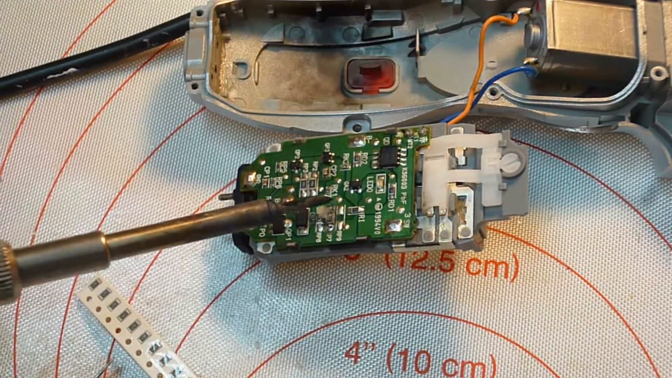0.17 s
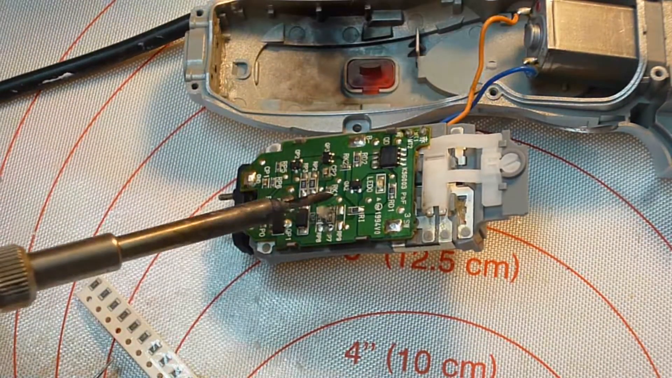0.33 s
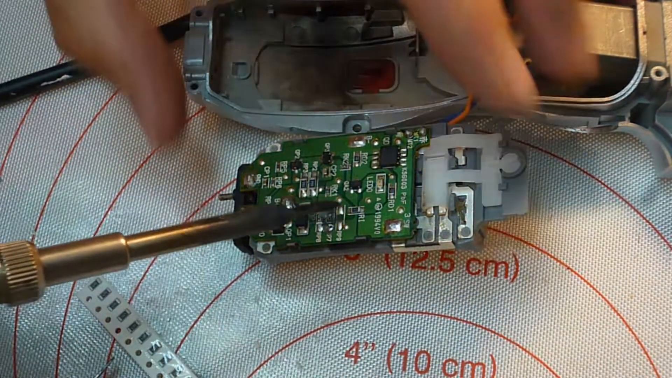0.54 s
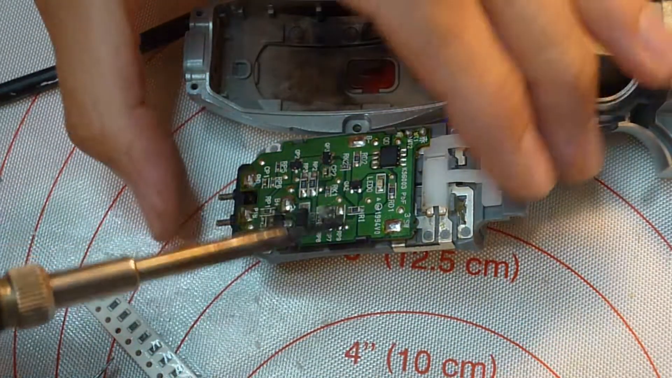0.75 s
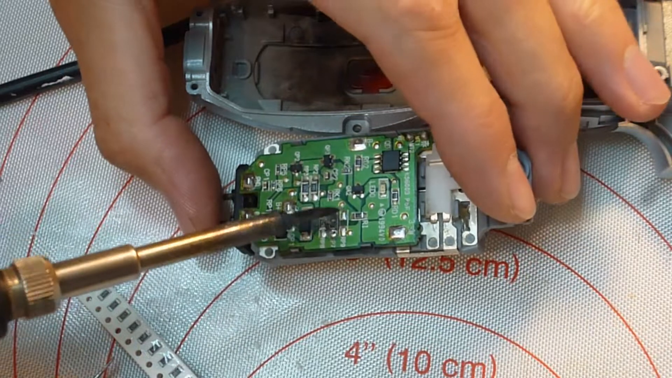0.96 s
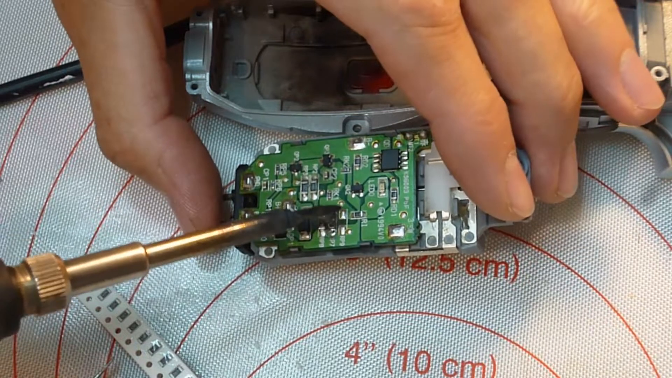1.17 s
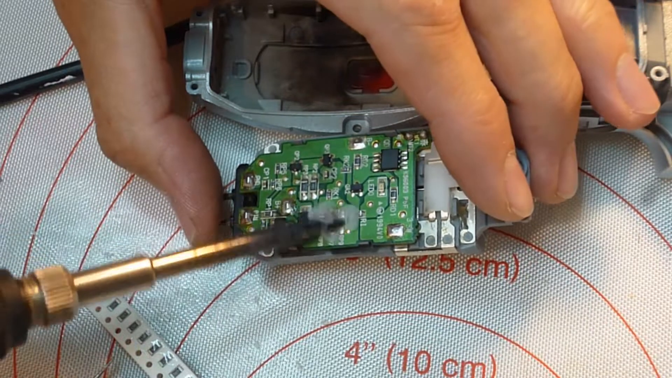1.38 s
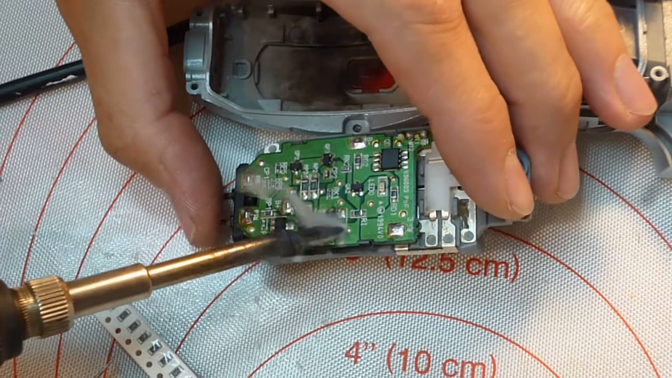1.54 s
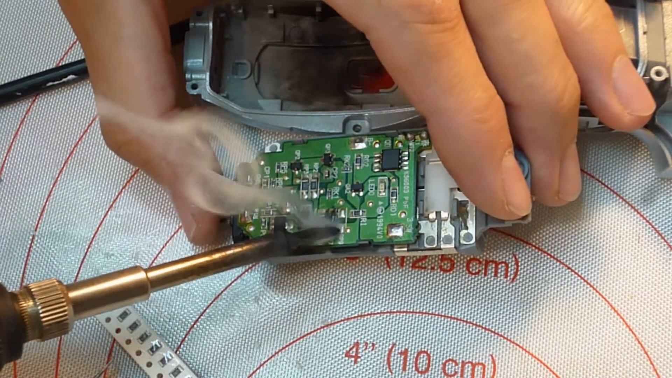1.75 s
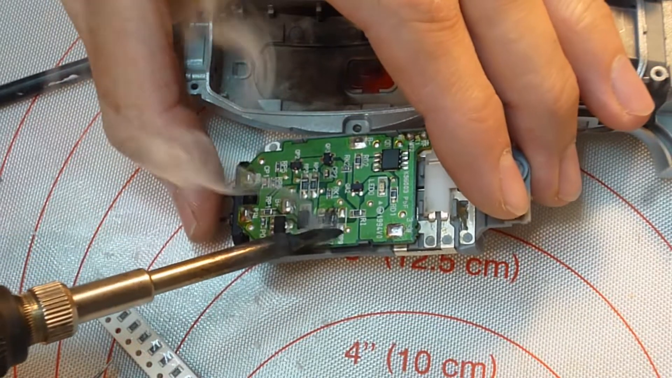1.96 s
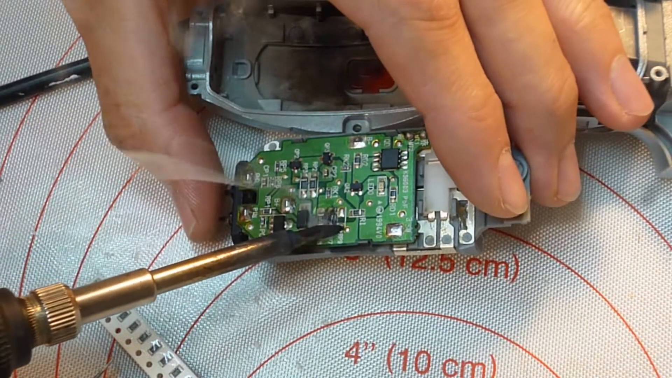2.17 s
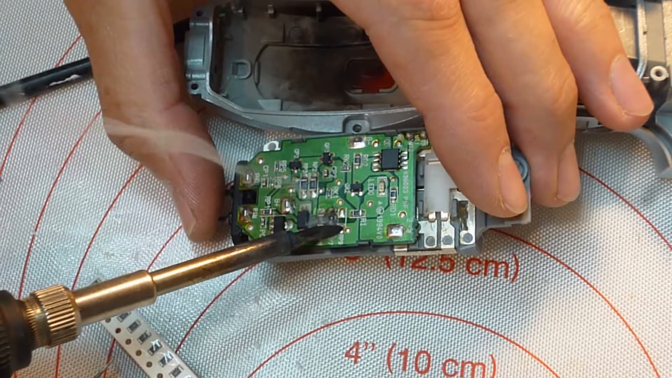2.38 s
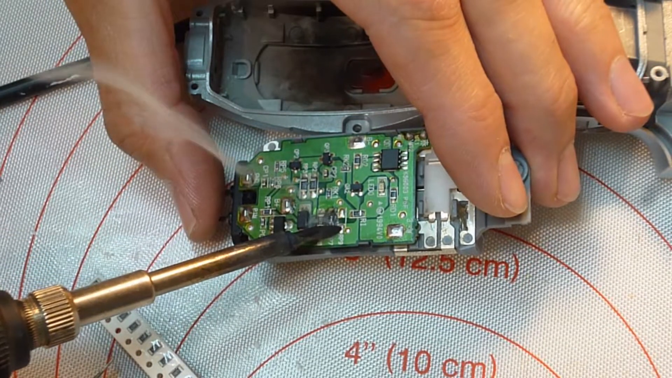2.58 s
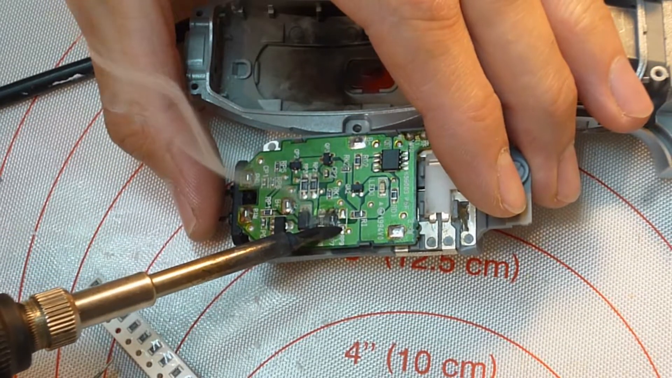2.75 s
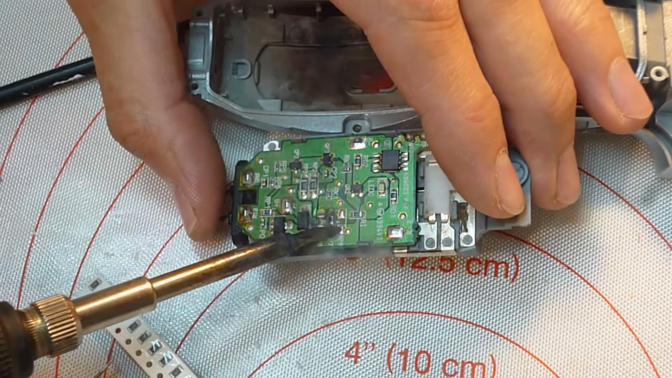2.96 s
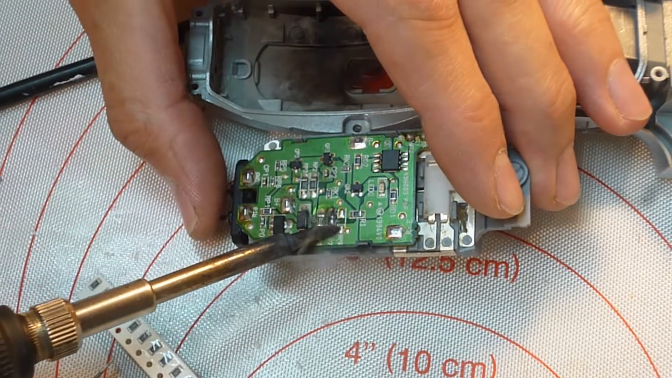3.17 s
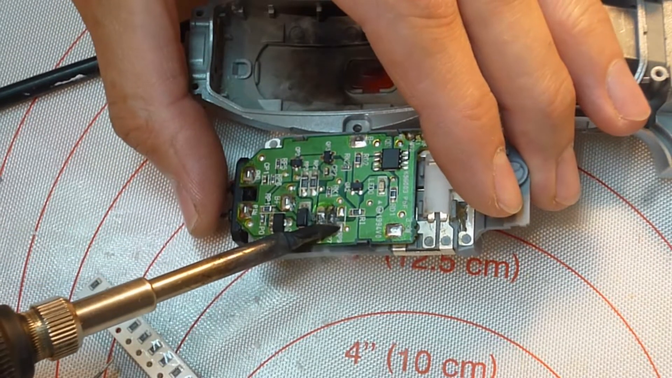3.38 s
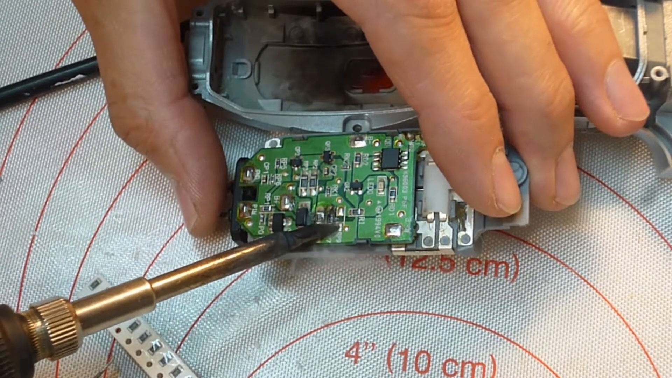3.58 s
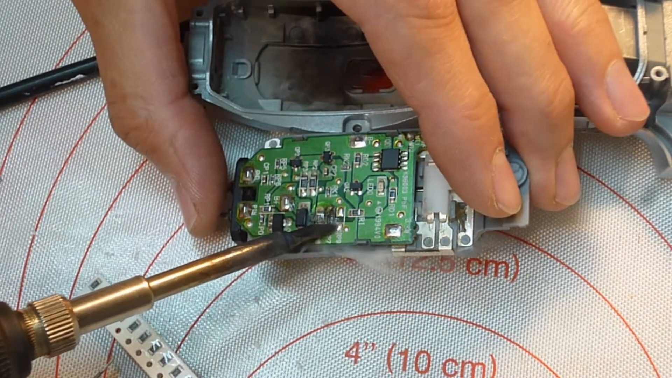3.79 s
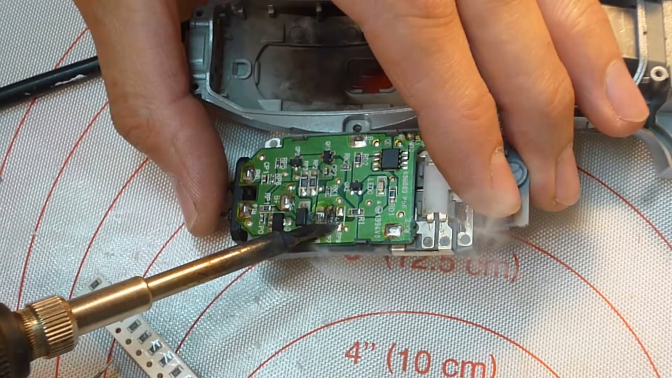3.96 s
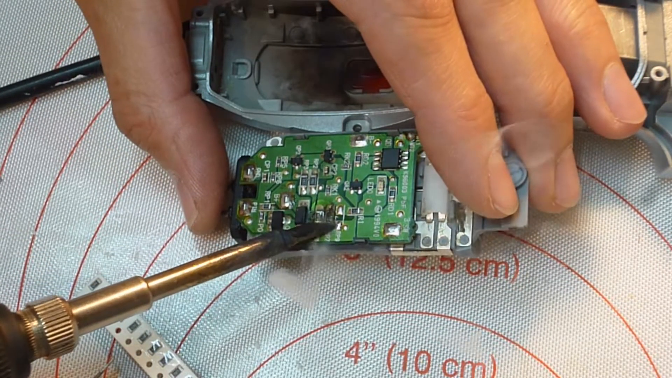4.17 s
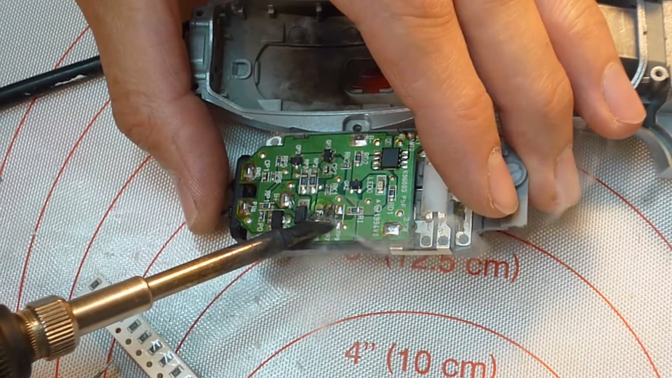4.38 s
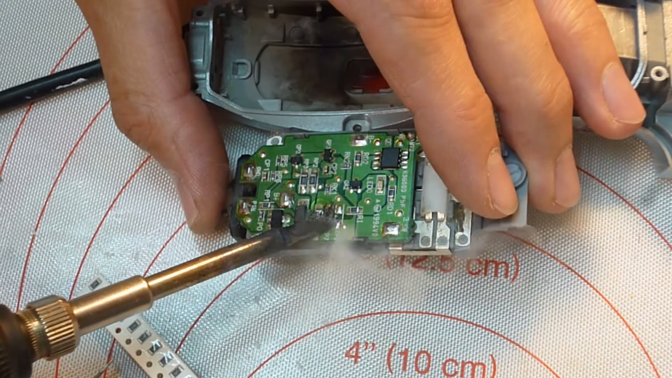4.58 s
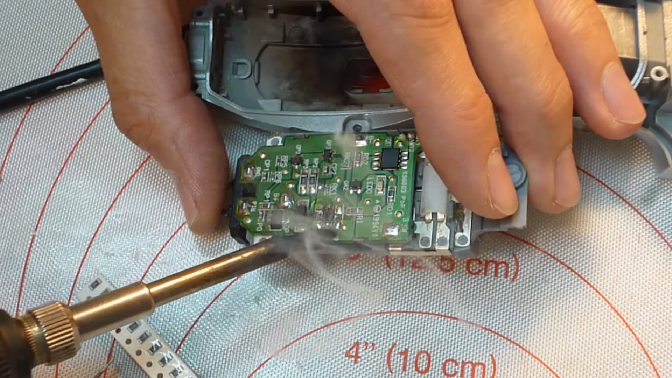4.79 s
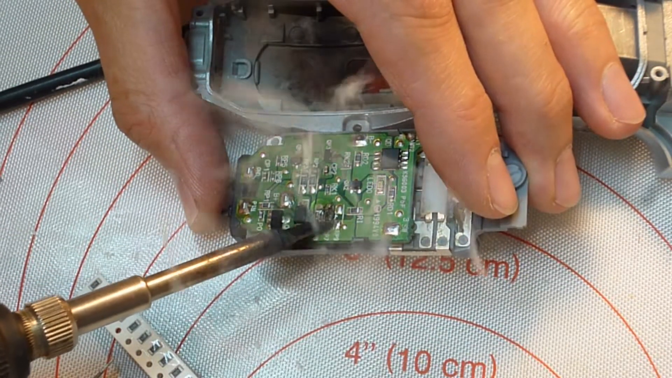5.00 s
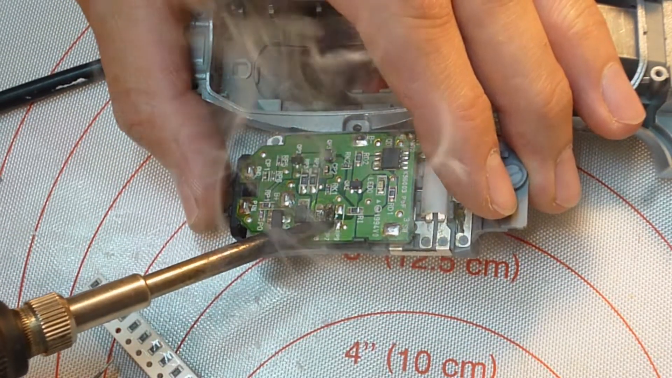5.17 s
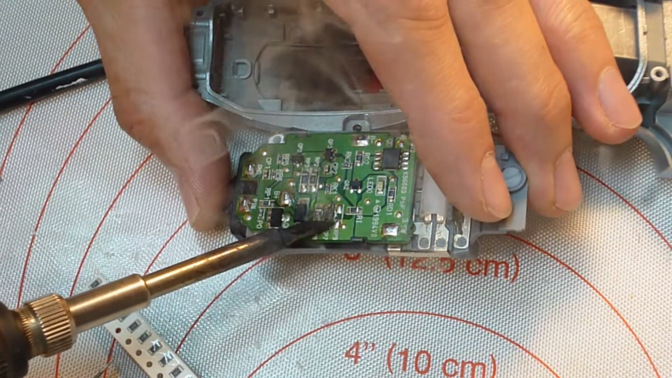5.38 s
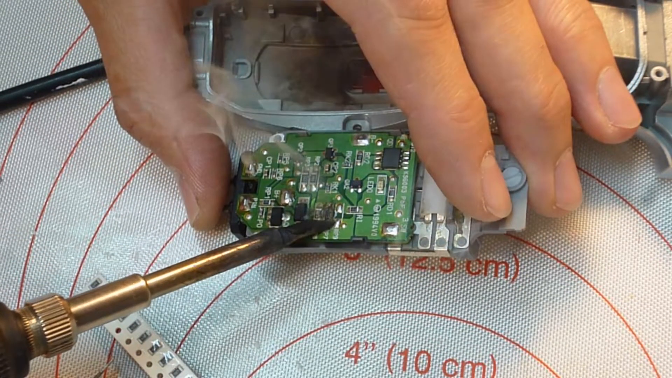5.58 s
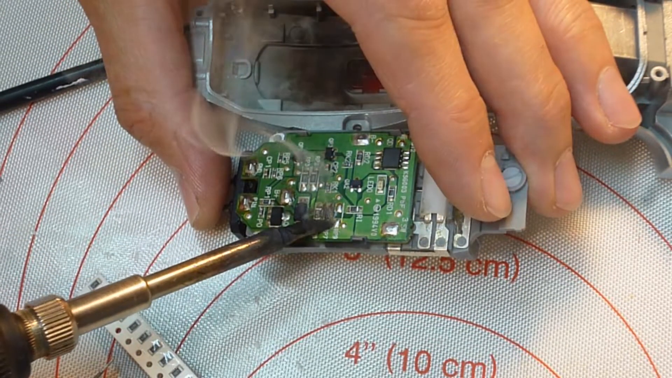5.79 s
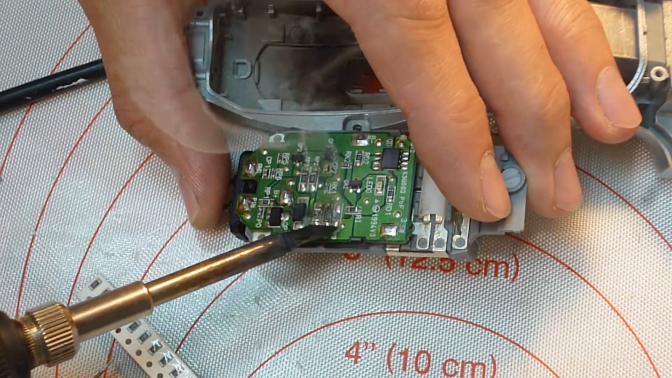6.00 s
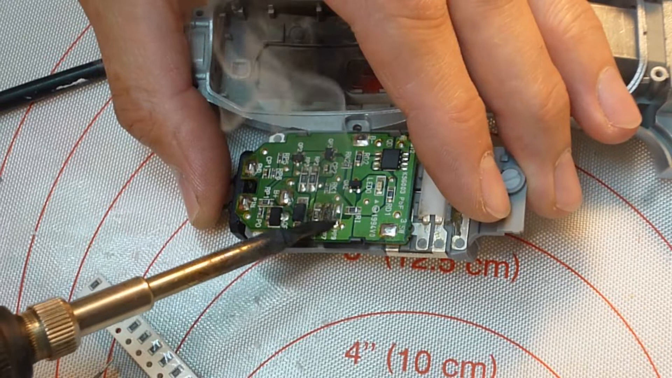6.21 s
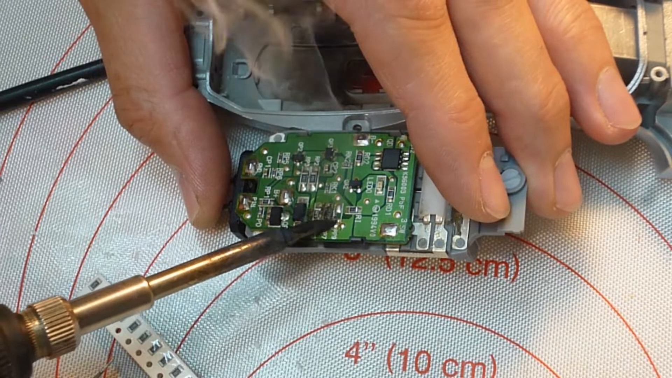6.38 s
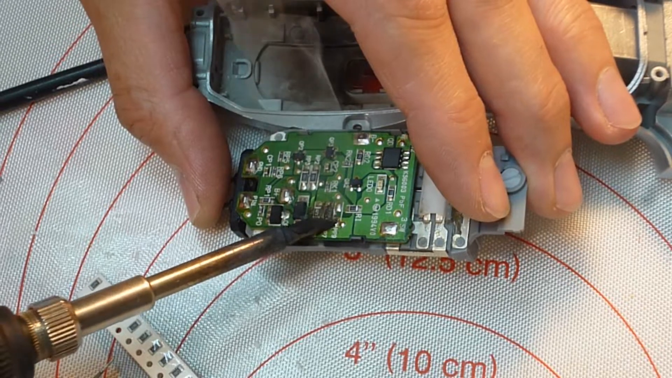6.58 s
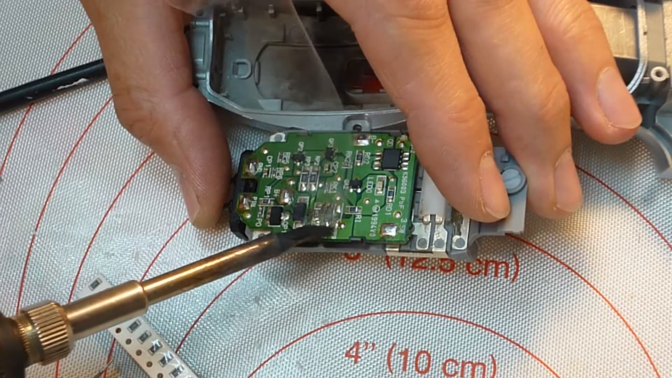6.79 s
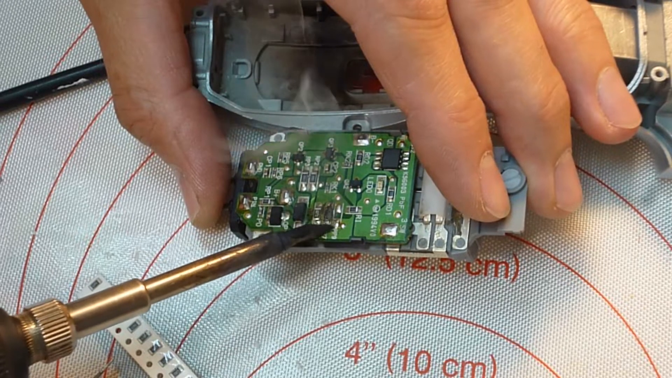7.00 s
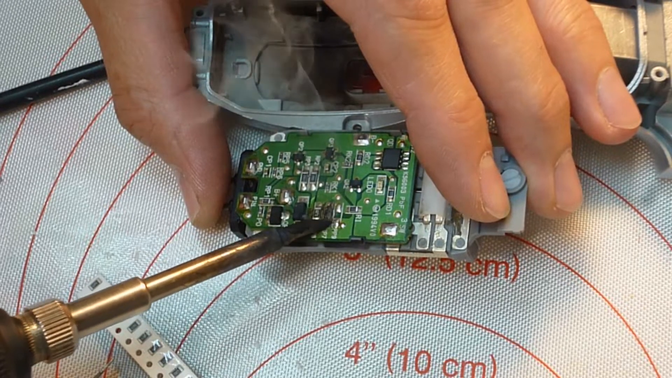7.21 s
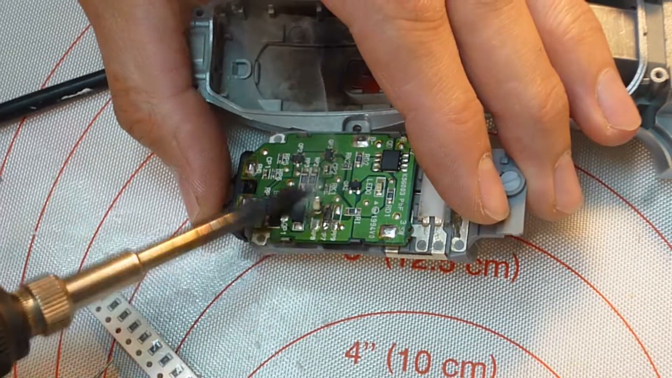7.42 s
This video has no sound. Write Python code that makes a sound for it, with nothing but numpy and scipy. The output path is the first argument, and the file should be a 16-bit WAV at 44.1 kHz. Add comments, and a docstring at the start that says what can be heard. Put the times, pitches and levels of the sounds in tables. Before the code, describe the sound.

Close mono pickup in a small, fairly dry room with soft low hush. First a heavy knock with a rapid rattle of bounces, then faint taps and pings of small parts. Melting flux under an iron gives isolated crisp ticks, one strong snap near the middle, a flurry of chirping squeaks, then a crackly run of pops with buzzes. Long near-silent gaps, with final light clicks.

```python
"""Stick-slip of a soldering tip on a circuit board

A hot iron tip creeps over a small board through melting flux, close to a mono microphone. Relaxation
oscillation gives single pops, buzzes and squeaks, as trains of slips that ring the modes of the board.
Decaying sines and modes make small taps and a tool dropped on the bench; modal noise makes fingers
shifting the plastic housing. A faint low tone rises; shaped noise is the hush of a small room."""
import sys
import numpy as np
from scipy import signal
from scipy.fft import rfft, irfft, next_fast_len
from scipy.io import wavfile
from scipy.ndimage import map_coordinates

SR = 44100
rng = np.random.default_rng(int(sys.argv[2]) if len(sys.argv) > 2 else 0)


def master(y):
    """Save y as 16-bit WAV."""
    cut = np.clip(np.atleast_2d(y).T, -1, 1)
    pcm = np.round(cut * 32767)  # scale
    wavfile.write(sys.argv[1], SR, pcm.astype(np.int16))


N = 328545  # length [samples]


def amp(db):
    """Logarithmic level: decibels to linear amplitude."""
    return 10 ** (np.asarray(db) / 20)


def along(points, hz):
    """Logarithmic pitch scale: interpolate (frequency [Hz], value) points on a log axis."""
    f, v = np.transpose(points)
    return np.interp(np.log(hz + 1), np.log(f + 1), v)


def filtered(x, response):
    """Linear filtering: multiply the spectrum by a complex response of frequency."""
    m = next_fast_len(len(x) + SR // 2)
    spectrum = rfft(x, m) * response(np.fft.rfftfreq(m, 1 / SR))
    return irfft(spectrum, m)[:len(x)]


def ringing(modes, damping=1, sign=-1):
    """Modal superposition: impulse response of a body, peak 1; damping scales the widths of its modes."""
    def resonance(f, center, width):
        return 1j * f * width / (center * center - f * f + 1j * f * width + 1e-9)

    def body(f):
        # sign is the polarity of each mode relative to its neighbour
        return sum(sign ** k * amp(db) * resonance(f, center, damping * width)
                   for k, (center, width, db) in enumerate(modes))

    ring = filtered(signal.unit_impulse(SR // 8), body)
    return ring / np.abs(ring).max()


def damped(hz, t60, attack):
    """Damped oscillation: an exponentially dying sine with a soft start, peak 1; times in s."""
    t = np.arange(SR // 8) / SR
    onset = 1 - np.exp(-t / attack)
    wave = np.sin(2 * np.pi * hz * t) * amp(-60 * t / t60) * onset
    return wave / np.abs(wave).max()


def add(track, s, sound):
    """Linear superposition: mix a sound into the track at time s, in place."""
    part = track[round(s * SR):][:len(sound)]
    part += sound[:len(part)]


# spectrum of the room noise: (frequency [Hz], relative spectral level [dB])
HUSH_SPECTRUM = [(15, -37.5), (25, -9), (33, -19), (102, -2.5), (340, -4), (446, -7.5), (543, -8),
                 (584, -10), (678, -10.5), (1420, -16), (6530, -27), (8150, -32), (8990, -41), (11700, -90),
                 (19800, -120)]
# mains hum: (frequency [Hz], rms level [dB])
MAINS_HUM = (51, -73.5)


def hush():
    """Stationary noise: spectrally shaped room rumble and microphone hiss, drifting in level, plus mains hum."""
    noise = filtered(rng.standard_normal(N), lambda hz: amp(along(HUSH_SPECTRUM, hz)))
    drift = map_coordinates(rng.standard_normal(40), [np.arange(N) * 4 / SR])  # 4 points per second
    hum_hz, hum_db = MAINS_HUM
    hum = np.sqrt(2) * amp(hum_db) * np.sin(2 * np.pi * hum_hz * np.arange(N) / SR)
    return amp(-54 + 0.3 * drift) * noise / noise.std() + hum


# reverberation of the room: (frequency [Hz], decay time T60 [s])
WALL_DECAY = [(300, 0.27), (2000, 0.18), (8000, 0.14)]


def room(x):
    """Diffuse reverberation: convolve with decaying noise, a new tail for each quarter second."""
    out, step = np.zeros(N), SR // 4
    for start in range(0, N, step):
        hz, t, cells = signal.stft(rng.standard_normal(SR // 3), SR, nperseg=256)
        decay = amp(-60 * t / along(WALL_DECAY, hz)[:, None])
        tail = signal.istft(cells * decay, SR, nperseg=256)[1]
        tail = tail / np.linalg.norm(tail)
        add(out, start / SR + 0.0045, signal.fftconvolve(x[start:start + step], tail))
    return out


# course of the low tone: (time [s], frequency [Hz], rms level [dB])
LOW_TONE = [(5.72, 75, -63), (5.76, 95, -53), (5.8, 119, -56.5), (5.84, 114, -50), (5.875, 105, -70)]


def swoop():
    """Frequency modulation: a faint low tone rises and fades, its phase the running sum of frequency."""
    s, hz, db = np.transpose(LOW_TONE)
    t = np.arange(N) / SR
    phase = 2 * np.pi * np.cumsum(np.interp(t, s, hz)) / SR
    level_db = np.interp(t, s, db, left=-120, right=-120)
    return np.sqrt(2) * amp(level_db) * np.sin(phase)


# modes of the plastic housing: (frequency [Hz], width [Hz], level [dB])
HOUSING_MODES = [(640, 340, -8.5), (973, 100, 4.5), (1686, 370, -6), (2830, 1200, -9.5)]
# finger slides on the housing: (start of hold [s], hold [s], rms level in the hold [dB])
FINGER_SLIDES = [(.19, 0.08, -54.5), (1.218, .058, -57), (2.216, 0.031, -52.5), (3.247, .005, -53),
                 (4.23, 0.0056, -51.5), (5.215, .05, -57.5), (7.44, .01, -45)]
GRIP_DB_PER_S, LET_GO_DB_PER_S = 796, 496  # rise before the hold, fall after it


def fingers():
    """Friction noise: skin drags in clumps on resonant plastic, gripping fast and letting go slower."""
    clump_db = 3.2 * np.repeat(rng.standard_normal(N // 200 + 1), 200)[:N]
    grain = rng.standard_normal(N) * amp(clump_db)
    rub = signal.fftconvolve(grain, ringing(HOUSING_MODES))[:N]
    t, press = np.arange(N) / SR, np.zeros(N)
    for s, hold, db in FINGER_SLIDES:
        below_db = np.maximum(GRIP_DB_PER_S * (s - t), LET_GO_DB_PER_S * (t - s - hold))
        press += amp(db - np.maximum(0, below_db))
    return rub / rub.std() * press


# modes of the bench top and the things on it: (frequency [Hz], width before damping [Hz], level [dB])
BENCH_MODES = [(216, 86, -19), (366, 77, -7.5), (596, 150, -2.5), (686, 93, -5.5), (847, 230, -8.5),
               (1093, 66, 1.5), (1380, 140, 1.5), (1690, 180, -6), (2100, 400, -7), (2540, 200, -20),
               (3160, 340, -10.5), (4030, 160, -9.5), (4640, 200, -40), (6040, 1300, -36)]
# the tool grazes, lands and bounces: (time [s], level [dB])
TOOL_BOUNCES = [(0.1053, -33), (0.114, -7), (0.1504, -15), (.1655, -22), (.177, -25)]
# in each bounce the hard edge lands first, then the body:
# (delay [s], level relative to the bounce [dB], low-pass corner set by hardness [Hz])
TOOL_CONTACTS = [(0, -5, 4500), (.001, -3, 3000), (.0024, 0.4, 2500)]
RATTLE_DB, RATTLE_T60_S = -25, .1  # level relative to the blow's impulse


def drop():
    """Impact excitation: each contact pushes, rings and rattles the bench; softer contacts are duller."""
    out, t = np.zeros(N), np.arange(SR // 8) / SR
    bench = -ringing(BENCH_MODES, damping=1.3, sign=1)  # negative: pushed down
    for bounce_s, bounce_db in TOOL_BOUNCES:
        for delay, part_db, corner_hz in TOOL_CONTACTS:
            s, db = bounce_s + delay, bounce_db + part_db
            rattle = amp(RATTLE_DB - 60 * t / RATTLE_T60_S) * rng.standard_normal(len(t))
            force = signal.unit_impulse(len(t)) + rattle
            blow = filtered(signal.fftconvolve(force, bench), lambda f: 1 / (1 + 1j * f / corner_hz) ** 2)
            add(out, s, amp(db) * blow / np.abs(blow).max())
            # a faint burst of bright noise
            bright = np.diff(rng.standard_normal(len(t) + 1))
            add(out, s, amp(db - 39 - 60 * t / 0.019) * bright)
    return out


# modes of the board and its carrier: (frequency [Hz], width before damping [Hz], level [dB])
BOARD_MODES = [(1008, 93, -12), (1603, 68, -16), (1830, 60, -8.5), (2106, 115, -8), (2517, 40, -14.5),
               (2753, 130, -9.5), (3586, 125, -4.5), (3870, 83, -8.5), (4142, 107, -6), (4490, 110, -10),
               (4864, 58, -14), (5436, 150, -7.5), (5890, 75, -7), (6120, 94, -12.5), (6740, 59, -1),
               (7300, 200, -15.5), (7760, 180, -12), (8160, 450, -19)]


def board_ring(damping=1):
    """Modal response: the board and its carrier answer one sharp blow, peak 1."""
    return ringing(BOARD_MODES, damping=damping)


# taps on the board: (time [s], level [dB], snap frequency [Hz], snap decay T60 [s],
# board ring relative to tap level [dB], housing knock relative to tap level [dB])
BOARD_TAPS = [(0.924, -52, 6600, .01, -2, 8), (1.034, -51, 6360, 0.0074, 6, 2),
              (1.1417, -49, 3420, .002, -17, 5), (1.3018, -32.5, 3670, 0.0034, -5, -9.5),
              (1.387, -53.5, 2740, 0.0074, 15, 12), (1.9201, -37.5, 4000, 0.0032, 0.5, -5),
              (2.328, -40, 2650, 0.0065, -22, -26), (2.392, -28, 3350, 0.0022, -7, -18),
              (2.409, -43, 5050, .005, -5, -19), (2.454, -44.5, 3800, 0.0087, -8, -15),
              (3.3466, -13, 4800, 0.002, -7.5, -19.5), (4.5038, -31.5, 5560, 0.0075, 0, -2),
              (4.966, -50.5, 5440, .006, 8, 4), (5.181, -43.5, 3140, 0.0059, 0, -2),
              (5.258, -51, 5500, 0.006, 2, -16), (6.2233, -37.5, 4660, 0.0047, 0.5, 5),
              (6.476, -54, 6000, .008, -3, -9), (6.661, -34, 5430, 0.0058, -15, -29),
              (6.664, -32.5, 5830, 0.0077, -23, -29), (7.026, -33, 5130, 0.005, 1.5, -2.5),
              (7.028, -33.5, 2100, 0.0017, -15, -4.5), (7.3538, -41.5, 5000, .005, -13, 0.5),
              (7.4007, -36, 4830, 0.0027, 0.5, -4.5), (7.435, -46, 2500, 0.0036, 7, 2),
              (7.4403, -25.5, 3350, 0.0028, -11, -18)]
# short pings of small loose parts: (time [s], peak level [dB], frequency [Hz], decay T60 [s])
PART_PINGS = [(.9155, -41.5, 570, 0.054), (.921, -44, 564, 0.1), (.9365, -46.5, 544, 0.045),
              (1.008, -44.5, 1010, 0.02)]


def taps():
    """Impact and modal decay: snap, blunter click and crackle set off board and housing; loose parts ping."""
    out, t = np.zeros(N), np.arange(SR // 8) / SR
    board = board_ring(damping=1.6)  # the holding hand damps the board
    housing = ringing(HOUSING_MODES)
    for s, db, hz, t60, ring_db, knock_db in BOARD_TAPS:
        click = amp(-9.0) * damped(0.66 * hz, 0.0026, .0001)
        snap = damped(hz, t60, .04 * t60) + click
        # crackle has the colour of the snap and dies four times slower
        grit = signal.fftconvolve(rng.standard_normal(len(t)), damped(hz, 0.00077, .0001))[:len(t)]
        crackle = amp(-9.0 - 60 * t / (4 * t60)) * grit / grit.std()
        bodies = amp(ring_db) * board + amp(knock_db) * housing
        add(out, s, amp(db) * (snap + crackle + bodies))
    for s, db, hz, t60 in PART_PINGS:
        add(out, s, amp(db) * damped(hz, t60, 0.00091))
    return out


# single slips of the tip: (time [s], peak level [dB])
SINGLE_SLIPS = [(3.554, -39), (4.15, -36), (4.157, -31), (4.328, -43), (4.3352, -43), (5.38, -26.5),
                (5.3869, -24.5), (5.3935, -23), (5.4, -24), (5.411, -22), (5.429, -22), (5.437, -24),
                (5.448, -24.5), (5.454, -24.5), (5.458, -27), (5.4624, -23.5), (5.4683, -29), (5.473, -27),
                (5.4813, -25), (5.5405, -26.5), (5.5544, -25.5), (5.5626, -24.5), (5.5702, -27),
                (5.576, -27), (5.5863, -30.5), (5.5965, -24), (5.603, -26), (5.6363, -39), (5.698, -26)]
# slides of the tip, each a train of slips gliding in rate and level:
# (start [s], length [s], first rate [Hz], last rate [Hz], first level [dB], last level [dB],
# unevenness [0-1], drive of the tip's swing relative to the slips [dB])
TIP_SLIDES = [(1.337, .022, 863, 856, -58, -49, .75, -10), (1.359, .04, 880, 908, -52.5, -61, .8, -12),
              (3.247, .07, 890, 1097, -58, -44.5, .35, -7), (3.314, .09, 1094, 893, -45, -55.5, .6, -7),
              (3.478, .065, 751, 189.5, -56, -48.5, .3, -6), (3.561, .022, 417, 221, -51.5, -49, .1, -6),
              (3.975, .012, 2080, 1630, -47.5, -45, .05, -13),
              (3.986, .013, 1634, 1643, -45, -36.5, 0.01, -13),
              (4.0, .012, 2840, 2930, -41, -40.5, .05, -10),
              (4.012, .013, 1718, 1875, -41.5, -40, .12, -13),
              (4.025, .013, 1890, 1680, -43, -48, 0.07, -13), (4.037, .054, 698, 647, -47, -47, .25, -15),
              (4.092, .018, 1170, 1178, -43.5, -39.5, 0.1, -13),
              (4.11, .036, 690, 220.6, -40, -52, .2, -15), (4.1587, .06, 338, 796, -42, -44.5, .2, -7),
              (4.218, .022, 1726, 1674, -45, -44, 0.07, -2), (4.241, .034, 1700, 1660, -53, -60.5, .05, -4),
              (4.335, .009, 700, 700, -46, -49, .4, 0), (4.345, .02, 1628, 1668, -49, -42, .04, 15),
              (4.363, .026, 1633, 1760, -46, -61.5, .02, 16), (5.578, .016, 199.7, 202, -44, -45, 0.3, -8),
              (5.607, .03, 399.5, 406, -41, -50.5, .3, -8), (5.7, .04, 339, 702, -40, -51, 0.4, -6),
              (5.738, .025, 751, 1284, -45, -43, .25, -6), (5.782, .047, 552, 598, -50, -50.5, .4, -9),
              (5.833, .038, 1224, 948, -58.5, -55, 0.4, -6), (7.02, .007, 886, 890, -54, -58, .75, -10),
              (7.359, .022, 892, 896, -55, -60, .7, -10), (7.441, .008, 868, 870, -42, -38, 0.8, -10)]
SLIDE_EDGE_S = .003  # sets the slope of the fade at both ends of a slide


def slips():
    """Stick-slip relaxation: each slip snaps and rings the board; fast even slips fuse into a squeak."""
    one = damped(5780, 0.0034, 0.00019) + amp(-4.5) * board_ring()
    one = one / np.abs(one).max()
    kicks, shakes = np.zeros((2, N + 16))
    for s, db in SINGLE_SLIPS:
        kicks[round(s * SR)] = amp(db)
    for s, length, first_hz, last_hz, first_db, last_db, uneven, swing_db in TIP_SLIDES:
        t = np.arange(0, length, 1 / SR)
        glide = first_hz * (last_hz / first_hz) ** (t / length)
        # one slip at each whole turn of the phase
        slip = np.flatnonzero(np.diff(np.floor(np.cumsum(glide) / SR + .5)))
        at, rate, loose = t[slip], glide[slip], np.clip(uneven, 0, 1)
        chance = rng.standard_normal((len(at), 2))
        edge = np.clip(np.minimum(at, length - at) / SLIDE_EDGE_S + .5, 0, 1)
        level_db = first_db + (last_db - first_db) * at / length + 5.7 * loose * chance[:, 0]
        # scale by the slip's energy and rate, so the level is that of the train
        size = edge * amp(level_db) * np.sqrt(SR / rate) / np.linalg.norm(one)
        jitter = 0.617 * loose * chance[:, 1] / rate
        place = np.minimum(s + at + jitter, N / SR) * SR
        # windowed sinc pulses place slips between samples
        near = np.floor(place)[:, None] + np.arange(-7, 9)
        pulse = size[:, None] * np.sinc(near - place[:, None]) * np.hanning(18)[1:-1]
        np.add.at(kicks, near.astype(int), pulse)
        # even slips lock to the bending of the iron's tip and swing it
        np.add.at(shakes, near.astype(int), amp(swing_db) * pulse * (1 - loose) ** 6)
    tip = amp(-30) * damped(1520, .015, .0002)
    return (signal.fftconvolve(kicks, one) + signal.fftconvolve(shakes, tip))[:N]


def scene():
    """Superposition: direct sound, one echo from the bench top, and the room, over the hush."""
    board, tool = slips() + taps() + fingers(), drop()
    echo = np.zeros(N)
    add(echo, .0029, amp(-12.5) * board)
    reverb = room(amp(-12.5) * board + amp(-16.0) * tool)
    return (board + echo + tool + reverb + swoop() + hush())[None]


def record(dry):
    """Band limitation: the microphone stage rolls off the top, has a narrow notch and a steady offset."""
    def response(f):
        rolloff = 1 / (1 + (f / 8250) ** 30)
        notch = 1 - .9 / (1 + 1j * (f - 4392) / 25)
        return rolloff * notch * (f < 9146)  # nothing from 9146 Hz up

    return filtered(dry[0], response)[None] + .009


dry = scene()
out = record(dry)
master(out)
```